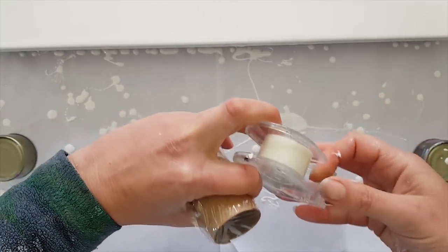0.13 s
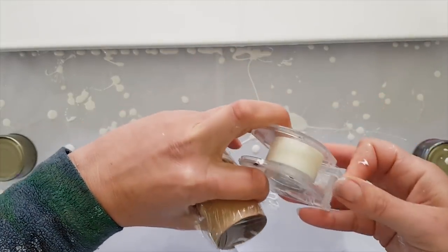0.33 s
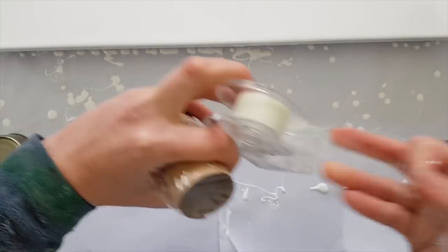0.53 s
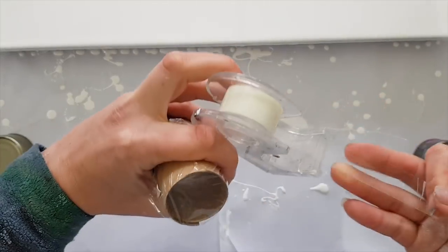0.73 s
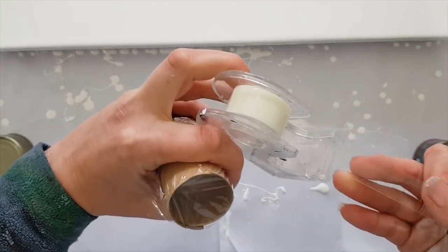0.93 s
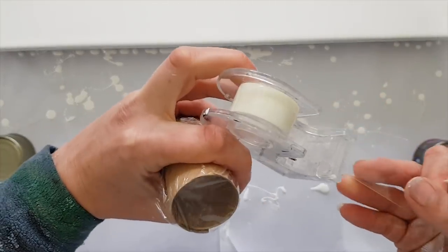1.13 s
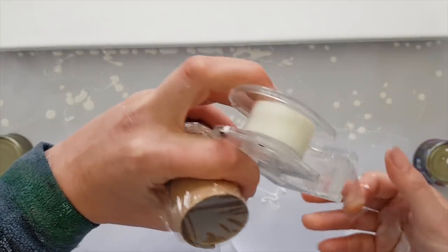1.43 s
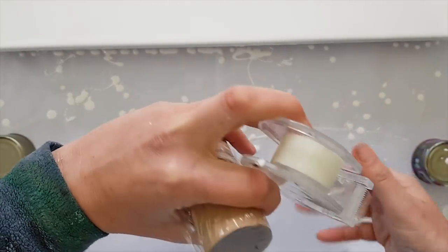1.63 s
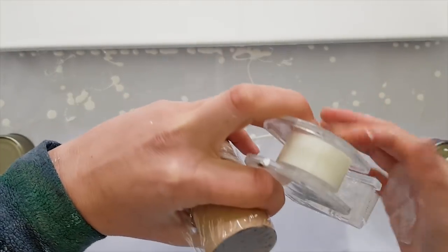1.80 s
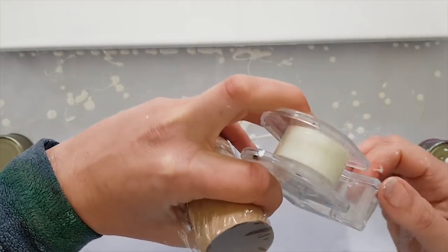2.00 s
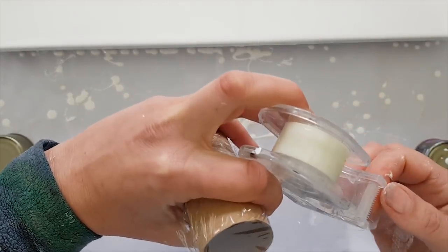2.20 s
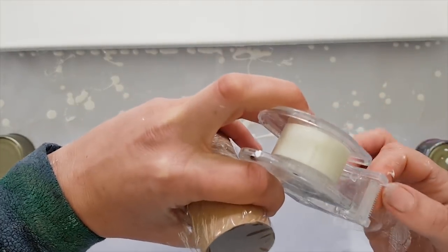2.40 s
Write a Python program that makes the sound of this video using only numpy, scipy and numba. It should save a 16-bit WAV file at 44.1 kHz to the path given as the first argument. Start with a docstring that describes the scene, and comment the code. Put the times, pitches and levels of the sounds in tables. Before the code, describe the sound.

Sticky tape rips off a roll in one quick, sizzling pull, just after fingers pick at its end and the plastic dispenser clicks. Faint brushes, taps and a scrape follow, close to the microphone in a small room.

```python
"""Fingers brush a plastic dispenser and pick at crinkling sticky tape, close to a stereo microphone
in a small room with a low hum. The dispenser clicks, and its hardest snap pings the cutter. The tape
jerks loose and rips off the roll in one quick pull: a stream of tiny adhesive snaps that sizzles and
makes the dispenser's shell sing. Afterwards fingers brush, tap and scrape the plastic.
The work top and the room scatter a little of the sound back."""
import sys
import numpy as np
from scipy import signal
from scipy.fft import rfft, irfft, next_fast_len
from scipy.io import wavfile
from scipy.ndimage import map_coordinates
from numba import njit

SR = 44100
rng = np.random.default_rng(int(sys.argv[2]) if len(sys.argv) > 2 else 0)


def to_wav(s):
    """Save 16-bit WAV."""
    ch = np.atleast_2d(s).T  # columns
    pcm = np.round(np.clip(ch, -1, 1) * 32767)  # PCM
    wavfile.write(sys.argv[1], SR, pcm.astype(np.int16))


N = 112454
TIME = np.arange(N) / SR
TAP_TIME = np.arange(SR // 5) / SR  # time within one click
TOP_HZ = 15780  # upper band limit

# Room rumble and microphone hiss. Each row: frequency in Hz, relative level in dB.
FLOOR_COLOUR = [(20, -33.5), (38, -12), (58, 2.5), (80, -8.5), (115, -2), (160, -8.5), (210, -17.5),
                (310, -21), (480, -32), (2500, -36.5), (8000, -41.5), (13000, -35.5)]
# The room's hum. Each row: time in seconds, level in dB.
HUM_LEVELS = [(0.06, -57), (0.91, -62), (0.98, -53), (1.65, -84), (2.01, -69), (2.06, -57.5)]
# Hands shifting. Each row: middle and half length in seconds, level in dB, centre in Hz.
HAND_SHIFTS = [(0, 0.052, -68.5, 286), (0.776, 0.011, -69.5, 191), (1.442, 0.274, -75.5, 306),
               (2.44, 0.13, -70, 273)]
# Finger strokes. Each row: middle and half length in seconds, hiss in dB, treble tilt in dB per
# octave, shell ring in dB.
BRUSHES = [(.01, 0.023, -59.5, -4.5, -67.5), (0.168, 0.07, -59.5, 1, -96), (1.086, 0.013, -64.5, -6, -83),
           (1.21, .035, -69, 2.5, -87), (1.309, 0.031, -61, -7, -61), (1.569, 0.046, -56, 1, -66.5),
           (1.971, .04, -70.5, -2.5, -80)]
# Skin sliding on plastic. Each row: frequency in Hz, relative level in dB.
SKIN_COLOUR = [(300, -57), (1200, -10), (3600, -11), (4600, -1), (6200, -4.5), (7900, -2.5), (9500, -9),
               (13000, 2), (15800, -2.5)]
# The dispenser's shell. Each row: mode frequency in Hz, relative level in dB, t60 in seconds.
SHELL_MODES = [(1360, -19.5, .02), (1464, -19, 0.023), (1802, -2, 0.076), (1922, -5.5, .05),
               (2074, -5, 0.045), (2197, -13, 0.019), (3400, -19, 0.049)]
# Picks at the tape's end. Each row: start and length in seconds, level in dB, treble tilt in dB per octave.
CRINKLES = [(.0495, 0.0015, -55.5, -1.5), (0.095, 0.0025, -51, 3), (0.1064, 0.002, -49, 4.5),
            (0.11, 0.0013, -54, 5.5), (0.13, 0.0023, -54.5, -1.5), (0.1435, 0.0027, -44, 2),
            (.162, 0.0048, -38.5, -2), (0.1805, 0.0064, -42, -2), (.187, 0.0023, -35, -1)]
# One crinkle. Each row: frequency in Hz, relative level in dB.
CRINKLE_COLOUR = [(300, -38.5), (1900, -23.5), (3000, -1.5), (8000, -0.5), (9200, -2), (12000, 1),
                  (15800, -3.5)]
# Clicks of the plastic. Each row: start and length in seconds, crack in dB, treble tilt in dB per
# octave, relative ring in dB, shell pitch under the grip as a ratio.
CLICKS = [ (.191, .003, -28, -1, -25, 1.07), (0.1946, .003, -21, -3.5, -29, 1.07),
          (0.199, .004, -35.5, -11, -35.5, 1.24), (0.2359, .0035, -15.5, 1, -26.5, 1),
          (0.3418, 0.008, -60.5, 1, -45, 1.02), (0.7768, 0.002, -49.5, 0.5, -66.5, 1.02),
          (1.051, 0.0021, -59, -2.5, -73, 1.03), (1.0809, 0.0014, -52, 6, -76, 1.03),
          (1.2693, 0.0045, -44.5, -4.5, -39, 1.09), (1.33, 0.0012, -50.5, 0, -65, 1.1),
          (1.5642, 0.0047, -36.5, 4.5, -43, 0.99), (1.919, 0.0035, -59.5, -4, -57, 1.06),
          (2.48, 0.0033, -37, 9, -68, 1.09)]
# The crack of a click. Each row: frequency in Hz, relative level in dB.
CRACK_COLOUR = [(100, -39), (500, -31.5), (1200, -7.5), (2700, -4.5), (5000, 1), (8000, 2.5), (9200, -5),
                (12000, 2), (15800, -3)]
# The dispenser's cutter. Each row: mode frequency in Hz, level in dB, t60 in seconds.
CUTTER_MODES = [(7850, -35, 0.055), (8300, -30, 0.04)]
# The tape jerking loose. Each row: start and length in seconds, level in dB.
JERKS = [(0.3992, 0.004, -15.5), (0.4157, 0.0037, -16.5), (0.4245, .003, -16.5), (0.428, 0.003, -15)]
# The pull. Each row: time in seconds, then relative levels in dB of peel, shell ring and strip flutter.
PULL_LEVELS = [(0.436, -20.5, -24, -53), (0.462, -18.5, -24.5, -49), (0.486, -19.5, -25.5, -52.5),
               (0.499, -19, -42, -51), (0.522, -18.5, -25, -53), (0.538, -21.5, -31, -42),
               (0.55, -17.5, -22, -42.5), (0.564, -27, -30, -49), (0.572, -30.5, -35.5, -54.5)]
# The peeling film. Each row: frequency in Hz, relative level in dB.
FILM_COLOUR = [(100, -31.5), (480, -26), (750, -16), (1400, -11.5), (2600, -6.5), (5800, -2.5), (8300, -2),
               (9300, -5.5), (11600, 0.5), (15800, -1)]
# The shell's note during the pull. Each row: time in seconds, pitch in Hz.
SING_PITCH = [(.49, 1790), (.506, 1920), (.526, 1890), (.543, 1797)]
# One slip of the peel line. Each row: frequency in Hz, relative level in dB.
SLIP_COLOUR = [(500, -48), (8800, -10), (11800, -0.5), (13300, -0.5), (15800, -6.5)]
# A dragging fingertip. Each row: frequency in Hz, relative level in dB.
CHAFE_COLOUR = [(3900, -12), (4450, -1.5), (5800, -6), (8100, -2), (9300, -12), (15800, -11)]
# The small room's decay. Each row: frequency in Hz, t60 in seconds.
ROOM_DECAY = [(200, .29), (2000, .31), (5500, .28), (14600, .25)]
# Reflections off room and work top. Each row: frequency in Hz, relative level in dB.
ECHO_COLOUR = [(200, -0.5), (2000, -1), (6000, -4.5), (12000, -4), (16000, -9.5)]
# The left microphone, facing away. Each row: frequency in Hz, level against the right in dB.
LEFT_SHADE = [(60, -6), (1000, -8.5), (4200, -6.5), (5800, -14.5), (7200, -18), (7800, -12), (8500, -3.5),
              (9700, -0.5), (11500, -5.5), (15500, -10.5)]
# How alike the two microphones hear. Each row: frequency in Hz, likeness from 0 to 1.
LIKENESS = [(60, 0.89), (700, 0.77), (2200, 0.39), (4400, .4), (9000, 0.2), (15000, .3)]


def amp(db):
    """Decibels to gain."""
    return 10 ** (np.asarray(db) / 20)


def unit(x):
    """Scale to rms 1."""
    return x / np.sqrt(np.mean(x ** 2) + 1e-20)


def along(points, hz):
    """Read (Hz, value) points on a log frequency axis."""
    freqs, values = np.transpose(points)
    return np.interp(np.log(hz + 1), np.log(freqs + 1), values)


def curves(rows):
    """One value per sample for each column after the time."""
    times, *columns = np.transpose(rows)
    return [np.interp(TIME, times, column) for column in columns]


def gate(start, end, rise, release):
    """A linear rise, a hold and an exponential release, all in seconds."""
    return np.clip((TIME - start) / rise, 0, 1) * np.exp(-np.maximum(TIME - end, 0) / release)


def filtered(x, response):
    """x through a frequency response."""
    size = next_fast_len(N + SR // 2)
    return irfft(rfft(x, size) * response(np.fft.rfftfreq(size, 1 / SR)), size)[..., :N]


def low_cut(x, hz, order):
    """x without the bass below hz."""
    return signal.sosfilt(signal.butter(order, hz, "highpass", fs=SR, output="sos"), x)


def convolved(x, response):
    """Each channel of x through an impulse response."""
    return signal.fftconvolve(x, np.atleast_2d(response), axes=1)[:, :N]


def colour(points, tilt_db=0, size=2048):
    """Causal impulse response of energy about 1 with this spectrum, tilted per octave above 3 kHz."""
    hz = np.fft.rfftfreq(size, 1 / SR)
    level_db = along(points, hz) + tilt_db * np.log2(np.clip(hz, 3000, TOP_HZ) / TOP_HZ)
    cepstrum = irfft(np.log(amp(level_db)))
    gain = np.exp(rfft(2 * cepstrum[:size // 2], size) - cepstrum[0])  # minimum phase
    return irfft(gain / np.sqrt(np.mean(np.abs(gain) ** 2 * (hz < TOP_HZ))))


@njit
def resonate(x, step, width):
    """Band-pass and high-pass outputs of a moving resonance; step is its centre in radians per sample."""
    out, low, band = np.zeros((2, len(x))), 0.0, 0.0
    for i in range(len(x)):
        low += step[i] * band
        high = x[i] - low - width * band
        band += step[i] * high
        out[0, i], out[1, i] = band * width, high
    return out


def gliding(x, hz, width, highpass=False):
    """White excitation twice through a resonance that can move, at rms 1; width is 1 / Q."""
    step = 2 * np.pi * np.clip(hz, 40, 3000) / SR * np.ones(N)
    once = lambda v: resonate(v, step, width)[int(highpass)]
    return unit(once(once(x if highpass else x / np.sqrt(step))))


def room_tone(floor_db=-60.5, hum_hz=57):
    """Room rumble, microphone hiss and a low hum that swells and fades."""
    hum_db, = curves(HUM_LEVELS)
    hum = amp(hum_db) * np.sqrt(2) * np.sin(2 * np.pi * (hum_hz * TIME + rng.random()))
    noise = unit(filtered(rng.standard_normal((2, N)), lambda hz: amp(along(FLOOR_COLOUR, hz))))
    return amp(floor_db) * noise + np.array([hum, np.zeros(N)])


def hand_shifts():
    """Hands and sleeve move near the microphone with a dull, soft rustle."""
    rustle = np.zeros(N)
    for middle, half, db, hz in HAND_SHIFTS:
        swell = np.exp(-((TIME - middle) / half) ** 2)
        rustle += amp(db) * swell * gliding(rng.standard_normal(N), hz, width=1.13)
    return rustle


def snaps(per_s=1300, jitter=.35, spread_db=-4.5, fizz_db=2.5, clumps_per_s=400, clump_db=.2):
    """Adhesive or skin lets go in uneven snaps, sized apart for each channel, with fine fizz between."""
    count = 8000
    gaps = np.exp(jitter * rng.standard_normal(count)) / per_s
    onsets = (np.cumsum(gaps) * SR).astype(int)
    sizes = amp(spread_db * np.clip(rng.standard_normal((2, count)), -2, 1.5))
    sizes *= rng.choice([-1, 1], (2, count))
    train = np.array([np.bincount(onsets, row, N)[:N] for row in sizes])
    clumps = map_coordinates(rng.standard_normal(count), [TIME * clumps_per_s])
    fizz = amp(fizz_db) * rng.standard_normal((2, N))
    return unit(amp(clump_db * clumps) * (unit(train) + fizz))


def shell(pitch=1):
    """The dispenser's ring after one tap, energy 1; the small shell radiates no bass."""
    ring = sum((-1) ** k * amp(db - 60 * TAP_TIME / t60) * np.sin(2 * np.pi * hz * pitch * TAP_TIME)
               for k, (hz, db, t60) in enumerate(SHELL_MODES))
    ring = low_cut(ring, hz=1090, order=2)
    return ring / np.linalg.norm(ring)


def finger_brushes():
    """Skin sliding on plastic hisses and rings the shell softly."""
    hiss, drive = np.zeros((2, N)), np.zeros(N)
    for middle, half, hiss_db, tilt_db, ring_db in BRUSHES:
        stroke = np.exp(-((TIME - middle) / half) ** 2)
        friction = rng.standard_normal((2, N)) * stroke * amp(hiss_db)
        hiss += convolved(friction, colour(SKIN_COLOUR, tilt_db))
        drive += stroke * amp(ring_db)
    return hiss + convolved(snaps() * drive, shell())


def crack(length, level_db, points, tilt_db, grain_db=6):
    """A brief cluster of fractures of very uneven size, as it reaches the two microphones."""
    size = len(TAP_TIME)
    fade = np.exp(-(TAP_TIME / length) ** 2)
    burst = rng.standard_normal((2, size)) * amp(grain_db * rng.standard_normal(size)) * fade
    burst *= np.linalg.norm(fade) / np.linalg.norm(burst, axis=1, keepdims=True)
    return amp(level_db) * np.sqrt(2) * convolved(burst, colour(points, tilt_db))[:, :size]


def tape_crinkles():
    """The tape's end crinkles thinly as it is picked at."""
    out = np.zeros((2, N + SR))
    for start, length, level_db, tilt_db in CRINKLES:
        at = round(start * SR)
        out[:, at:at + len(TAP_TIME)] += crack(length, level_db, CRINKLE_COLOUR, tilt_db)
    return out[:, :N]


def plastic_clicks(ring_gain_db=27, grip_t60_s=.092):
    """Each click is a crack and a ring of the shell, which the gripping fingers damp and retune."""
    out = np.zeros((2, N + SR))
    for start, length, crack_db, tilt_db, ring_db, pitch in CLICKS:
        damping = amp(ring_db + ring_gain_db - 60 * TAP_TIME / grip_t60_s)
        ring = damping * shell(pitch) * [[1], [.4]]
        at = round(start * SR)
        out[:, at:at + len(TAP_TIME)] += crack(length, crack_db, CRACK_COLOUR, tilt_db) + ring
    return out[:, :N]


def cutter_ping(start_s=.2355):
    """The hardest click sets the cutter ringing, thin and high."""
    age = np.maximum(TIME - start_s, 0)
    return sum(amp(db - 60 * age / t60) * np.sin(2 * np.pi * hz * age) for hz, db, t60 in CUTTER_MODES)


def tape_rip(start_s=.434, end_s=.566, strip_start_hz=1250, growth_per_s=24.5):
    """A few jerks, then the peel runs; its snaps sound through the shell, the free strip and the film."""
    running = gate(start_s, end_s, rise=.0028, release=.006)
    jerks = sum(amp(db) * gate(at, at + length, rise=.0004, release=.0015) for at, length, db in JERKS)
    peel_db, ring_db, flutter_db = curves(PULL_LEVELS)
    ring_drive = running * amp(ring_db - 1.5) + jerks * amp(-8)
    flutter_drive = running * amp(flutter_db + 2) + jerks * amp(-17)
    film_drive = running * amp(peel_db + 4) + jerks
    note = running * amp(ring_db - 3) * shell_song()
    crackle = snaps()
    ring = convolved(crackle * ring_drive, shell())
    ring[0] += note
    # The free strip's pitch falls as it lengthens.
    loose_s = JERKS[0][0]
    strip_hz = strip_start_hz / (1 + growth_per_s * np.clip(TIME - loose_s, 0, end_s - loose_s))
    flutter = gliding(snaps()[0], strip_hz, width=.63) * flutter_drive
    # The film radiates little below that pitch.
    radiated = np.array([gliding(row, strip_hz, width=.97, highpass=True) for row in crackle])
    film = convolved(radiated * film_drive, colour(FILM_COLOUR))
    sizzle = peel_slips() * running * amp(peel_db + 1)
    return low_cut(film + sizzle + ring + flutter, hz=156, order=4)  # a narrow strip has no deep bass


def shell_song(waver_hz=22, wavers_per_s=160):
    """The pull makes the shell sing on one narrow, wavering pitch."""
    waver = map_coordinates(rng.standard_normal(N), [TIME * wavers_per_s])
    hz = curves(SING_PITCH)[0] + waver_hz * waver
    return np.sqrt(2) * np.sin(2 * np.pi * np.cumsum(hz) / SR)


def peel_slips(per_s=900, jitter=.3, spread_db=2, decay_s=.00015):
    """The peel line sticks and slips at a nearly even rate; each jump is a tiny, very bright burst."""
    count = 4000
    gaps = np.exp(jitter * rng.standard_normal(count)) / per_s
    onsets = (np.cumsum(gaps) * SR).astype(int)
    sizes = amp(spread_db * np.clip(rng.standard_normal(count), -2, 1))
    train = np.bincount(onsets, sizes, N)[:N]
    bursts = signal.lfilter([1], [1, -np.exp(-1 / (decay_s * SR))], train)
    return unit(convolved(bursts * rng.choice([-1, 1], (2, N)), colour(SLIP_COLOUR)))


def fingertip_scrape(start_s=2.262, end_s=2.402, fade_s=.031, hiss_db=-63.5, band_db=-65.5):
    """A fingertip drags along the dispenser's edge: a hiss and a narrow, rising chafe that stops short."""
    age = TIME - start_s
    stroke = np.clip(np.minimum(age, end_s - TIME) / fade_s, 0, 1)
    pressure = np.sin(np.pi * np.clip(age / (end_s - start_s), 0, 1))
    hiss = amp(hiss_db) * pressure * convolved(snaps(), colour(CHAFE_COLOUR))
    band = gliding(snaps()[0], hz=1695 + 1800 * age, width=.24)
    return hiss + amp(band_db) * stroke * band


def echo(decay, delay_s):
    """A delayed diffuse tail of energy 1 per channel; decay gives its t60 by frequency."""
    hz, t, spectrum = signal.stft(rng.standard_normal((2, SR // 2)), SR, nperseg=128)
    level_db = along(ECHO_COLOUR, hz)[:, None] - 60 * t / along(decay, hz)[:, None]
    tail = signal.istft(spectrum * amp(level_db), SR, nperseg=128)[1]
    tail /= np.linalg.norm(tail, axis=1, keepdims=True)
    return np.pad(tail, ((0, 0), (round(delay_s * SR), 0)))


def microphones(pair, left_lag_s=.00003):
    """The right microphone faces the tape and takes row 0; the left blends both rows, shaded and late."""
    def left_response(hz):
        alike = along(LIKENESS, hz)
        blend = np.array([alike, np.sqrt(1 - alike ** 2)])
        return blend * amp(along(LEFT_SHADE, hz)) * np.exp(-2j * np.pi * hz * left_lag_s)
    return np.array([filtered(pair, left_response).sum(axis=0), pair[0]])


def scene(work_top_db=-9.5, work_top_t60_s=.093, room_db=-16):
    """Tape and dispenser close to the microphones, above a work top in a small room."""
    direct = tape_rip() + tape_crinkles() + plastic_clicks() + cutter_ping()
    direct += finger_brushes() + fingertip_scrape() + hand_shifts()
    work_top = convolved(direct, echo([(1000, work_top_t60_s)], delay_s=.005))
    room = convolved(direct, echo(ROOM_DECAY, delay_s=.008))
    return microphones(direct + amp(work_top_db) * work_top + amp(room_db) * room + room_tone())


def record(dry, ceiling=.78):
    """The recorder rounds off the highest peaks and keeps nothing above its band limit."""
    rounded = dry / (1 + (dry / ceiling) ** 6) ** (1 / 6)
    return filtered(rounded, lambda hz: np.clip((TOP_HZ - hz) / 200 + .5, 0, 1))


dry = scene()
out = record(dry)
to_wav(out)
```